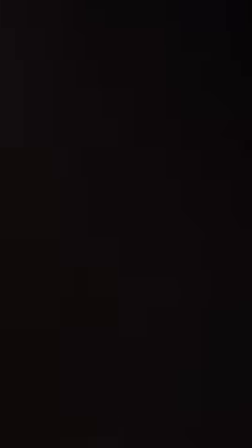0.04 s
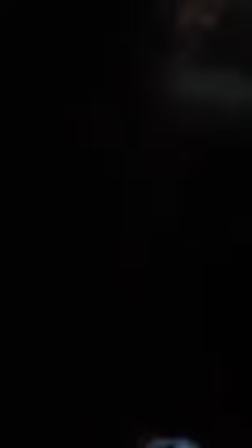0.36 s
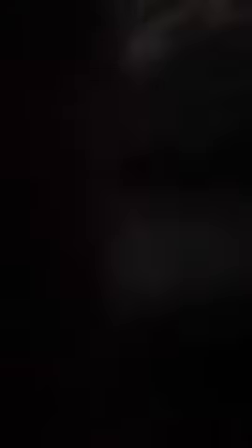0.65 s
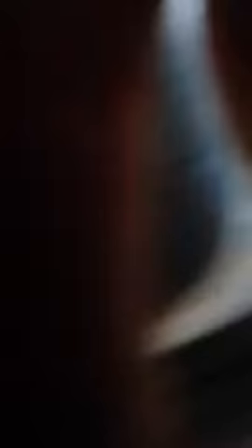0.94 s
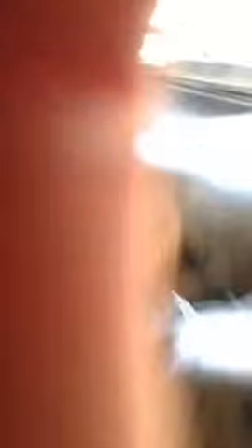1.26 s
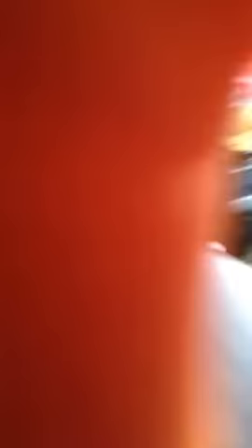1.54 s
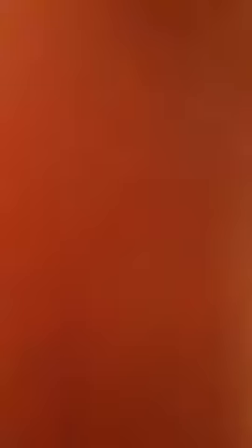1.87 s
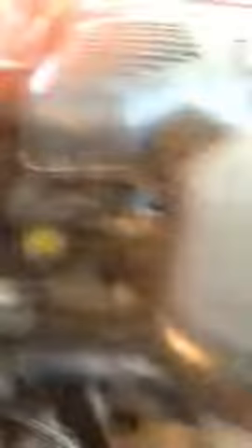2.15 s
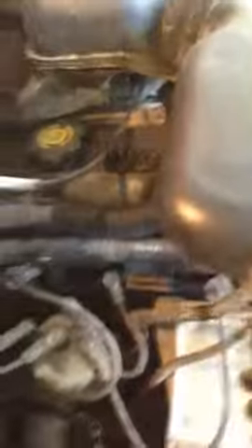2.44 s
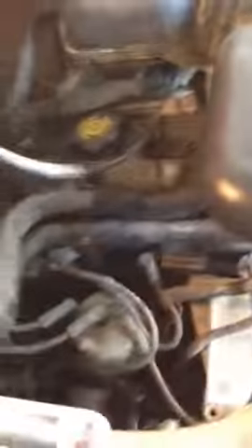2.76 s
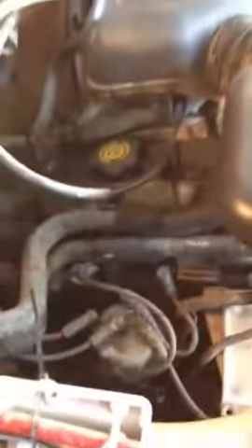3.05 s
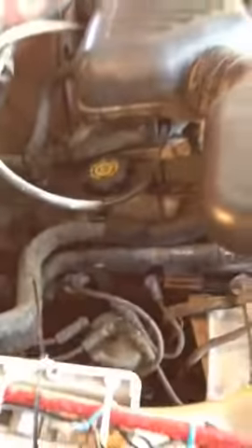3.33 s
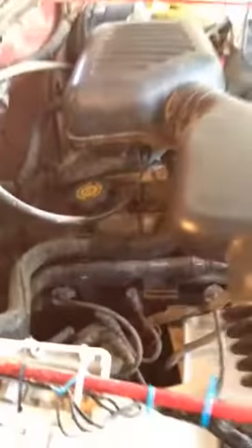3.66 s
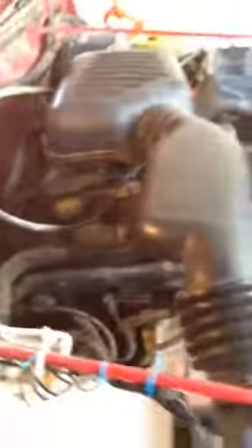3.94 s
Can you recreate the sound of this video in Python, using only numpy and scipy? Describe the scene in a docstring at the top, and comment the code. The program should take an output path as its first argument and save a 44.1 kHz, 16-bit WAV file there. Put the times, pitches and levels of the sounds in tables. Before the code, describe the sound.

A car engine idles with a rapid, regular knocking and ticking over a low rumble.

```python
"""In a car's engine bay, a four-cylinder engine idles; the microphone starts deep inside and draws back.
One loose part knocks once per engine cycle (two turns of the crankshaft), a fine tick comes each time
a cylinder fires, and the valves rattle in between. Underneath, the firings drone, air rumbles and
belts hiss. The bay adds a short echo to the knocks, and a faint whistle joins near the end."""
import sys
import numpy as np
from scipy import signal
from scipy.fft import rfft, irfft, next_fast_len
from scipy.io import wavfile
from scipy.ndimage import map_coordinates

SR = 44100
rng = np.random.default_rng(int(sys.argv[2]) if len(sys.argv) > 2 else 0)


def put_to_file(sound):
    """Save the sound as 16-bit audio at rate SR, in the file named by the first command-line argument."""
    columns = np.atleast_2d(sound).T  # one column per channel
    safe = np.clip(columns, -1, 1)
    whole_steps = np.round(safe * 32767)
    wavfile.write(sys.argv[1], SR, whole_steps.astype(np.int16))


N = 176400

# knocks of the loose part, one per cycle, which set the engine's pace: t/s, relative level/dB
KNOCKS = [(0.0437, -11.5), (0.189, -12.5), (0.3331, -11.5), (0.4797, -15), (0.6271, -9), (0.7743, -14),
          (0.9215, -10), (1.069, -10.5), (1.2178, -9), (1.364, -10), (1.51, -13.5), (1.658, -10.5),
          (1.8052, -13.5), (1.951, -17), (2.0975, -16.5), (2.2466, -13), (2.393, -15), (2.5406, -14.5),
          (2.691, -14), (2.842, -17), (2.9894, -15), (3.1347, -15.5), (3.2762, -15.5), (3.4211, -13.5),
          (3.5686, -17.5), (3.714, -16.5), (3.861, -20)]
# duller knocks of the next cylinder: t/s, relative level/dB
TAPS = [(0.6628, -19), (0.8104, -16), (1.1055, -13.5), (1.254, -10), (1.3992, -13.5), (1.9872, -20.5),
        (2.8769, -25)]
# relative strength of each cylinder, in firing order: tick/dB, light knock/dB, chug/dB
CYLINDERS = [(-2, -8, 0), (-2, 0, 1), (1.5, -3, -3), (1, 0, 0)]
# where the microphone is: t/s, position (0 deep in the bay, 1 drawn back)
DRAW_BACK = [(1.0, 0.097), (1.6, 1)]
# relative loudness of the moving parts: t/s, whirr/dB, rattle/dB, hiss/dB
MOVING_PARTS = [(0, -34, -35, -45), (.15, -33.5, -36.5, -40.5), (.28, -31, -32.5, -29.5),
                (.45, -35, -31, -50), (.8, -32.5, -33.5, -55), (1.22, -32.5, -31.5, -42.5),
                (1.6, -34, -33, -35), (2.1, -35, -42, -41), (2.4, -34, -44.5, -39),
                (2.9, -35.5, -52, -39.5), (4, -36, -52.5, -42)]


def knocks(knock_db=-4.5, rebound_s=0.0047, rebound_db=-6, chatter_db=-17, tap_db=-9, light_db=5):
    """The loose part strikes, bounces once and chatters; the cylinders add duller knocks."""
    # tone of the sharp knocks and of the dull ones: f/Hz, level/dB
    sharp_tone = [(500, -17), (1100, -10), (1500, 0.5), (3300, 1), (4200, -12.5), (6000, -17.5),
                  (15000, -36)]
    dull_tone = [(600, -27), (1200, 3.5), (1600, 0.5), (2050, 8), (2700, -4), (8000, -58)]
    times, db = np.transpose(KNOCKS)
    blow_db = np.r_[db, db + rebound_db] + knock_db
    blow = bursts(np.r_[times, times + rebound_s], blow_db, attack=0.00067, t60=0.023)
    chatter = bursts(times, db + chatter_db, attack=0.0019, t60=0.15) * amp(0.91 * wobble(350))
    taps = amp(tap_db) * bursts(*np.transpose(TAPS), attack=0.00024, t60=0.029)
    light = bursts(*firings("light knock", scatter_db=0.5), attack=0.0032, t60=0.087)
    light *= amp(curves(MOVING_PARTS)[0] + light_db)  # rises and falls with the whirr
    return np.hypot(blow, chatter) * noise(sharp_tone) + np.hypot(taps, light) * noise(dull_tone)


def clacks(tap_db=-7):
    """Struck metal rings briefly at each knock and tap; the knock rings most deep in the bay."""
    # notes that a knock and a tap ring with: f/Hz, relative level/dB, time to fade by 60 dB/s
    knock_notes = [(1740, -5, 0.027), (1990, -2.5, 0.031), (2427, -4, 0.029), (3256, -3, 0.026)]
    tap_notes = [(1858, 4.5, 0.019), (1907, -4, 0.067), (2450, -7, 0.025)]
    knock_db = -4 - 3 * curves(DRAW_BACK)[0]
    knock_ring = ring(KNOCKS, knock_notes, attack=0.0022, detune=0.02)
    tap_ring = ring(TAPS, tap_notes, attack=0.001, detune=0.0075)
    return amp(knock_db) * knock_ring + amp(tap_db) * tap_ring


def ticks(lag_s=0.0004, shut_s=0.0036, shut_db=-4):
    """A bright, gritty double tick at each firing, like a fuel injector opening and shutting."""
    # strength of the tick: t/s, relative level/dB
    strength = [(0, -24.5), (.92, -26.5), (1.12, -33.5), (1.6, -33), (4, -36)]
    # tone of the tick: f/Hz, level/dB
    tone = [(1500, -25), (4500, -4), (8700, -5), (10200, -1), (11800, 1), (15000, -3.5)]
    times, db = firings("tick", scatter_db=1.6)
    pairs = bursts(np.r_[times, times + shut_s] + lag_s, np.r_[db, db + shut_db], attack=0.0006, t60=0.027)
    grit_db = wobble(900)
    return amp(curves(strength)[0] + grit_db) * pairs * noise(tone)


def valve_rattle(steady_db=-1.5, valve_db=3.5):
    """Closing valves rattle, with a metallic rasp that shifts as the microphone moves."""
    # valve closings: place in the cycle (0 to 1), relative level/dB
    closings = [(0.066, 13), (0.153, 14.5), (.395, 10), (.53, 14.5), (.78, 12), (0.863, 16.5),
                (0.918, 13.5)]
    # tone of the rattle: f/Hz, level/dB
    tone = [(1500, -8.5), (2800, -5.5), (3700, 0), (5500, 1), (8000, -10), (10000, -20.5), (15000, -50)]
    # pitch and strength of the rasp: t/s, f/Hz, level/dB
    rasp_path = [(.7, 4920, -48), (.9, 4890, -33.5), (1.1, 4764, -38), (1.65, 5090, -43),
                 (1.9, 4970, -37.5), (2.15, 4900, -50)]
    rasp_hz, rasp_db = curves(rasp_path)
    hits = bursts(*each_cycle(*np.transpose(closings), scatter_db=1.5), attack=0.004, t60=0.025)
    shaking = np.hypot(amp(steady_db), amp(valve_db) * hits)
    rattle = amp(curves(MOVING_PARTS)[1]) * shaking * noise(tone)
    return rattle + amp(rasp_db) * unit(shaking) * narrow(rasp_hz, width_hz=260)


def shafts_and_belts(rough_db=1.18, hiss_trim_db=-1):
    """Spinning shafts and belts whirr and hiss, with a fast flutter in loudness."""
    # tone of the whirr and of the hiss: f/Hz, level/dB
    whirr_tone = [(300, 5), (550, 0.5), (700, 2.5), (1150, -1), (1550, 1), (4000, -3), (8000, -16),
                  (15000, -22.5)]
    hiss_tone = [(3000, -20), (6000, -2), (7800, 0.5), (10000, -5.5), (15500, -16)]
    whirr_db, _, hiss_db = curves(MOVING_PARTS)
    whirr = amp(whirr_db + rough_db * wobble(120)) * noise(whirr_tone)
    return whirr + amp(hiss_db + hiss_trim_db + wobble(150)) * noise(hiss_tone)


def drone(waver_db=1.5, boom_db=-27, boom_lag_s=0.0057):
    """The firings blend into a low hum; deep in the bay a boom at twice the firing rate joins it."""
    # notes of the hum: multiple of the cycle rate (rounded below), deep in the bay/dB, drawn back/dB
    notes = [(12, -32, -28.5), (16, -22, -23), (20, -61, -37.5), (28, -50, -37), (44, -35, -64),
             (65.36, -41.5, -47.5)]
    # rise and fall of the hum, used at half depth: t/s, level/dB
    swell = [(0, -24), (.5, -28.5), (1.1, -23.5), (1.7, -28.5), (2.1, -28), (2.45, -26), (2.8, -30.5),
             (3.3, -26.5), (3.7, -29), (4, -28)]
    back, = curves(DRAW_BACK)
    level_db, = curves(swell)
    swell_db = 0.5 * (level_db - level_db.mean())
    starts = cycle_starts()
    cycles_at = lambda t: np.interp(t, starts, np.arange(len(starts)))
    angle = 2 * np.pi * (cycles_at(clock()) - 0.5 / len(CYLINDERS))  # half a firing behind the ticks
    hum = 0
    for multiple, near_db, far_db in notes:
        db = near_db + (far_db - near_db) * back + swell_db + waver_db * wobble(14)
        hum += amp(db) * np.cos(round(multiple) * angle)
    boom = np.cos(2 * np.pi * 2 * len(CYLINDERS) * cycles_at(clock() - boom_lag_s))
    return hum + amp(boom_db + waver_db * wobble(9.6)) * (1 - back) * boom


def thuds(hz=85, t60=0.045):
    """Soft, low blows that die away after a swing or two."""
    # the thuds: t/s, level/dB
    blows = [(.050, -16), (0.125, -9), (.213, -11), (0.27, -5), (0.341, -3.5), (0.635, -7.5), (.745, -10),
             (0.861, -13), (1.113, -17), (1.409, -6.5), (3.151, -14)]
    ages = [(np.maximum(clock() - start, 0), db) for start, db in blows]
    return sum(amp(db - 60 * age / t60) * np.sin(2 * np.pi * hz * age) for age, db in ages)


def air(rumble_trim_db=-3, steady_db=-3, pulse_db=1, lag_s=0.007):
    """Air rumbles dully and gives a hollow chug after each firing."""
    # relative loudness of the air: t/s, rumble/dB, chug/dB
    loudness = [(0, -42, -23), (.35, -35, -26.5), (.95, -37, -27.5), (1.45, -28, -33), (1.8, -33, -35),
                (2.4, -30.5, -37), (2.8, -42, -37.5), (3.3, -29, -34.5), (4, -33, -38)]
    # tone of the rumble and of the chug: f/Hz, level/dB
    rumble_tone = [(15, -30), (30, 2), (45, 4), (65, -1), (100, -4), (160, -8), (400, -84)]
    chug_tone = [(90, 2.5), (150, 4), (200, 3.5), (260, -2), (330, -0.5), (440, -3), (520, -12),
                 (800, -12.5), (1500, -43)]
    rumble_db, chug_db = curves(loudness)
    times, db = firings("chug", scatter_db=3.0)
    pulses = bursts(times + lag_s, db + pulse_db, attack=0.0071, t60=0.15)
    rumble = amp(rumble_db + rumble_trim_db) * noise(rumble_tone)
    return rumble + amp(chug_db) * (amp(steady_db) + pulses) * noise(chug_tone)


def growl(level_db=-42, lag_s=0.008):
    """Deep in the bay, each firing also stirs a low, hoarse note."""
    times, db = firings("chug", scatter_db=5.0)
    pulses = bursts(times + lag_s, db, attack=0.003, t60=0.15)
    closeness = 1 - curves(DRAW_BACK)[0]
    return amp(level_db) * closeness * pulses * narrow(hz=690, width_hz=90)


def sizzle(at_s=2.23, width_s=0.03, level_db=-42):
    """One brief, bright rattle."""
    swell = np.exp(-((clock() - at_s) / width_s) ** 2)
    return amp(level_db) * swell * narrow(hz=10200, width_hz=700)


def whistle(start_s=3.62, rise_s=0.098, level_db=-49):
    """A faint, thin whistle joins late."""
    fade_in = np.clip((clock() - start_s) / rise_s, 0, 1)
    return amp(level_db) * fade_in * narrow(hz=8050, width_hz=90)


def engine_body(x):
    """The block and covers boost some pitches and swallow others; which ones depends on where you listen."""
    # peaks and dips, deep in the bay and drawn back: f/Hz, width/Hz, level/dB
    near_peaks = [(1160, 33, -2), (1880, 49, 2.5), (2256, 117, 6.5), (2945, 25, -16), (3860, 420, 4.5),
                  (6620, 710, 5.5)]
    far_peaks = [(990, 4.7, 9), (1550, 43, 2.5), (3940, 46, 1.5), (11700, 580, 3), (14900, 1000, -1.5)]

    def shaped(peaks):
        return filtered(x, lambda f: amp(sum(db / (1 + ((f - hz) / width) ** 2) for hz, width, db in peaks)))

    back, = curves(DRAW_BACK)
    return (1 - back) * shaped(near_peaks) + back * shaped(far_peaks)


def bay_echo(x, t60=0.08, delay_s=0.01204):
    """Sound bounces around the engine bay and quickly dies away."""
    t = np.arange(SR // 3) / SR
    tail = rng.standard_normal(len(t)) * amp(-60 * t / t60) * (t > delay_s)
    return signal.fftconvolve(x, tail / np.linalg.norm(tail))[:N]


def cycle_starts():
    """When each engine cycle starts: at every knock, plus one more at either end."""
    times = np.array(KNOCKS)[:, 0]
    return np.r_[2 * times[0] - times[1], times, 2 * times[-1] - times[-2]]


def each_cycle(places, levels_db, scatter_db):
    """Times and slightly random levels of hits that come at the same places in every cycle."""
    starts = cycle_starts()
    times = starts[:-1, None] + np.diff(starts)[:, None] * np.asarray(places)
    db = np.asarray(levels_db) + scatter_db * rng.standard_normal(times.shape)
    return times.ravel(), db.ravel()


def firings(sound, scatter_db):
    """Times of the evenly spaced firings, and the level of the chosen sound at each."""
    column = ("tick", "light knock", "chug").index(sound)
    places = np.arange(len(CYLINDERS)) / len(CYLINDERS)
    return each_cycle(places, np.array(CYLINDERS)[:, column], scatter_db)


def bursts(times, levels_db, attack, t60):
    """A loudness curve that jumps up at each time, then fades by 60 dB every t60 seconds."""
    power, t = np.zeros(N), clock()
    for start, db in zip(times, levels_db):
        part = slice(*np.searchsorted(t, [start, start + 2 * t60]))
        age = t[part] - start
        power[part] += (amp(db - 60 * age / t60) * (1 - np.exp(-age / attack))) ** 2
    return np.sqrt(power)


def ring(blows, notes, attack, detune):
    """Each blow sets the notes ringing, at slightly different pitches every time."""
    out, t = np.zeros(N + SR), np.arange(SR // 8) / SR
    for start, db in blows:
        for hz, note_db, t60 in notes:
            cycles = hz * t * (1 + detune * rng.standard_normal()) + rng.random()
            loudness = amp(db + note_db - 60 * t / t60) * (1 - np.exp(-t / attack))
            out[round(start * SR):][:len(t)] += loudness * np.sin(2 * np.pi * cycles)
    return out[:N]


def noise(tone):
    """Noise of strength 1, shaped by a tone table."""
    hz, db = np.transpose(tone)
    gain = lambda f: amp(np.interp(np.log(f + 1), np.log(hz), db))
    return unit(filtered(rng.standard_normal(N), gain))


def narrow(hz, width_hz):
    """Noise of strength 1, gathered around one steady or moving pitch."""
    slow = lambda: filtered(rng.standard_normal(N), lambda f: 1 / (1 + (f / width_hz) ** 2))
    angle = 2 * np.pi * np.cumsum(hz * np.ones(N)) / SR
    return unit(slow() * np.cos(angle) + slow() * np.sin(angle))


def filtered(x, gain):
    """Turns each frequency f in x up or down by gain(f)."""
    size = next_fast_len(N + SR // 2)
    return irfft(rfft(x, size) * gain(np.fft.rfftfreq(size, 1 / SR)), size)[:N]


def wobble(rate):
    """A smooth curve through `rate` random points a second."""
    return map_coordinates(rng.standard_normal(int(N * rate / SR) + 4), [clock() * rate])


def curves(rows):
    """Turns each table column after the time into one value per sample."""
    times, *columns = np.transpose(rows)
    return [np.interp(clock(), times, column) for column in columns]


def clock():
    """The time of every sample, in seconds."""
    return np.arange(N) / SR


def unit(x):
    """Scales x to an average strength (rms) of 1."""
    return x / np.sqrt(np.mean(x ** 2) + 1e-20)


def amp(db):
    """Turns decibels into a volume factor."""
    return 10 ** (np.asarray(db) / 20)


def scene(echo_db=-8):
    """All parts of the engine, heard at one microphone."""
    knocking = knocks() + clacks()
    echo = amp(echo_db) * bay_echo(knocking)
    clatter = engine_body(knocking + echo + ticks() + valve_rattle() + shafts_and_belts())
    return (clatter + sizzle() + whistle() + drone() + growl() + air() + thuds())[None]


def record(dry, low_cut_hz=33, top_hz=15450):
    """Softens the deepest bass and removes the highest treble."""
    gain = lambda f: (f < top_hz) * (1 - 1 / (1 + (f / low_cut_hz) ** 4))
    return filtered(dry[0], gain)[None]


dry = scene()
out = record(dry)
put_to_file(out)
```